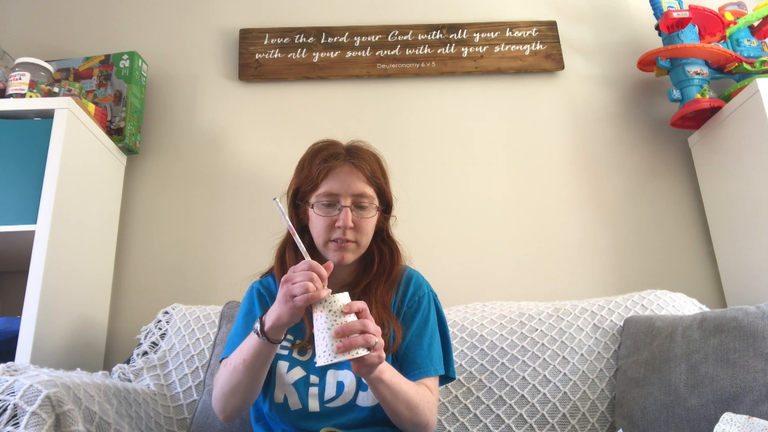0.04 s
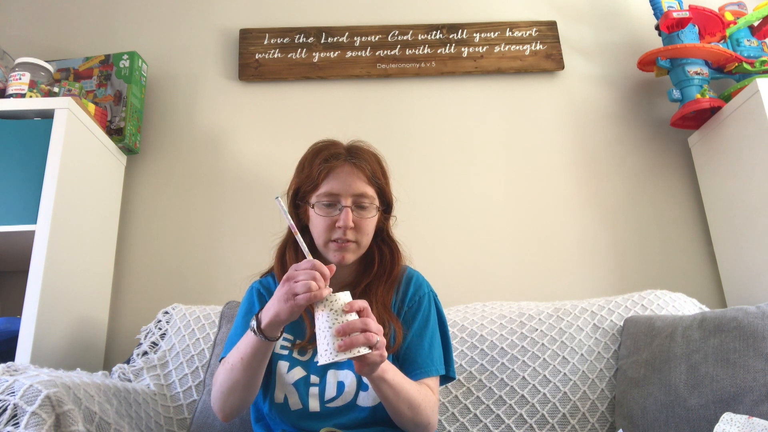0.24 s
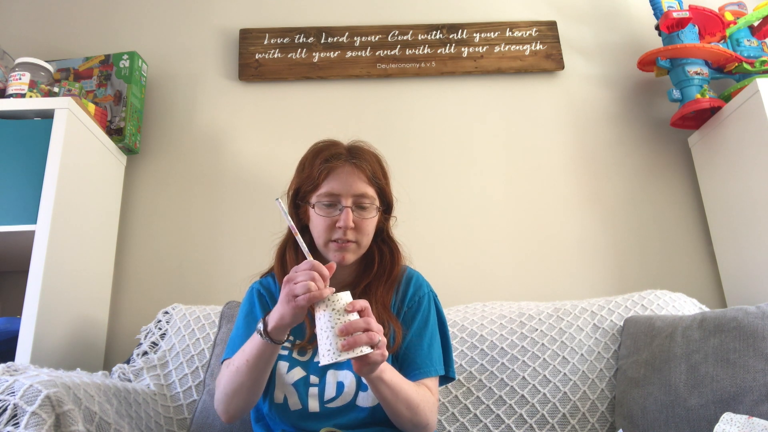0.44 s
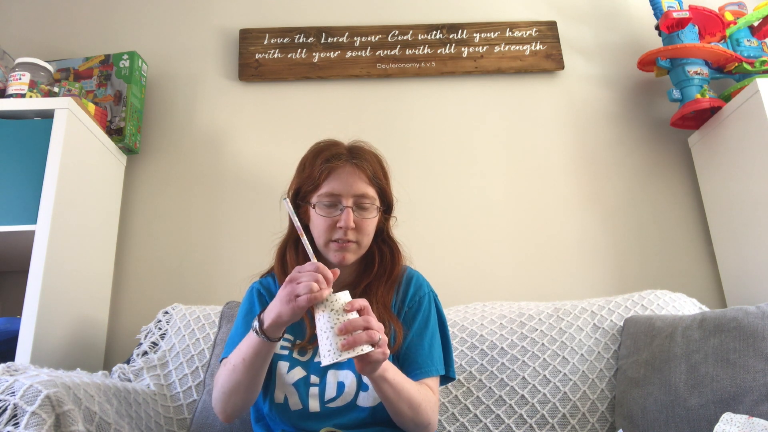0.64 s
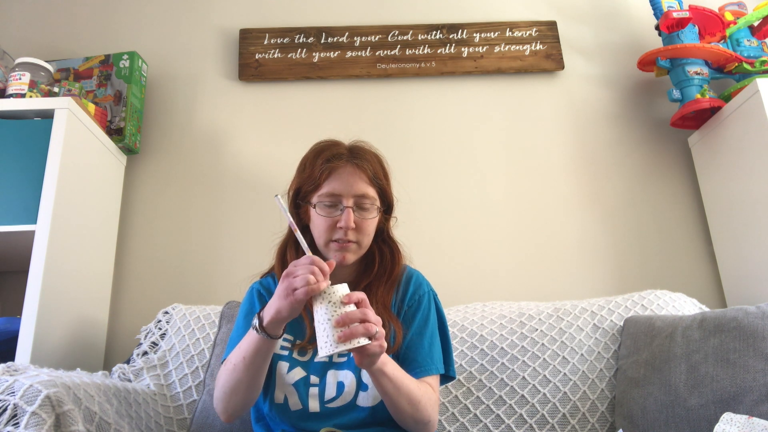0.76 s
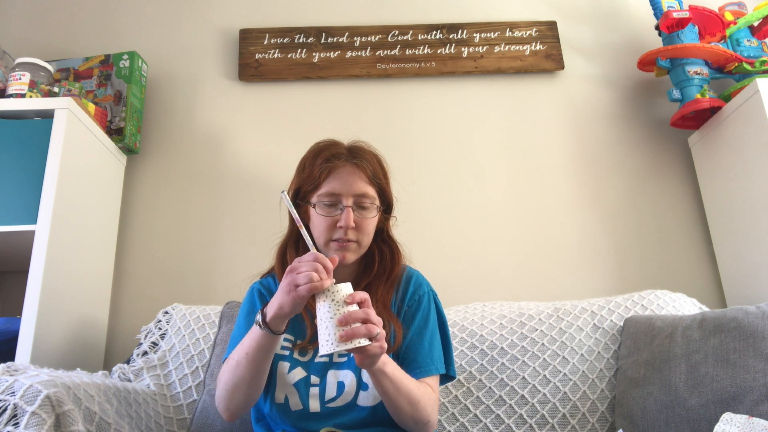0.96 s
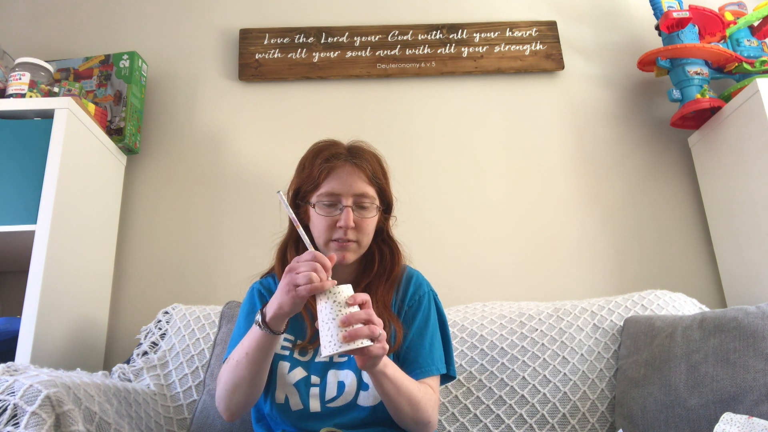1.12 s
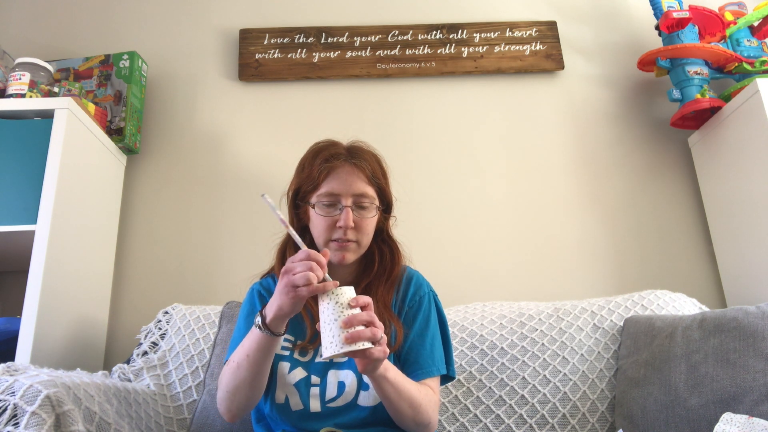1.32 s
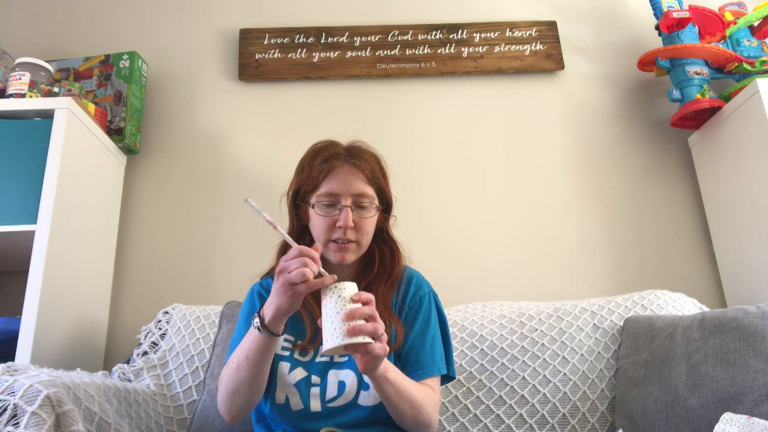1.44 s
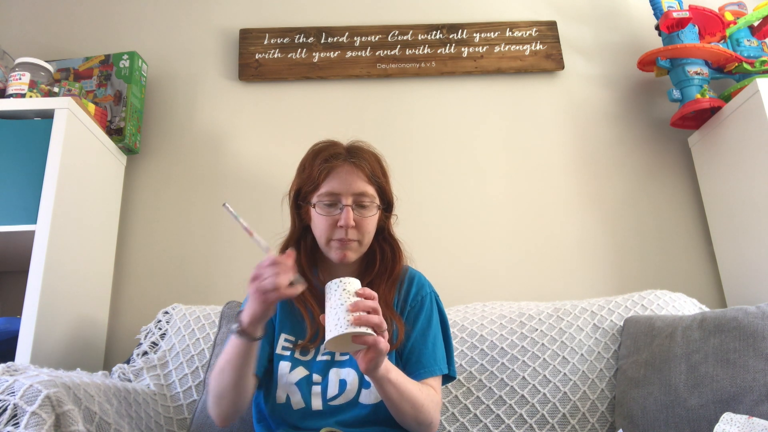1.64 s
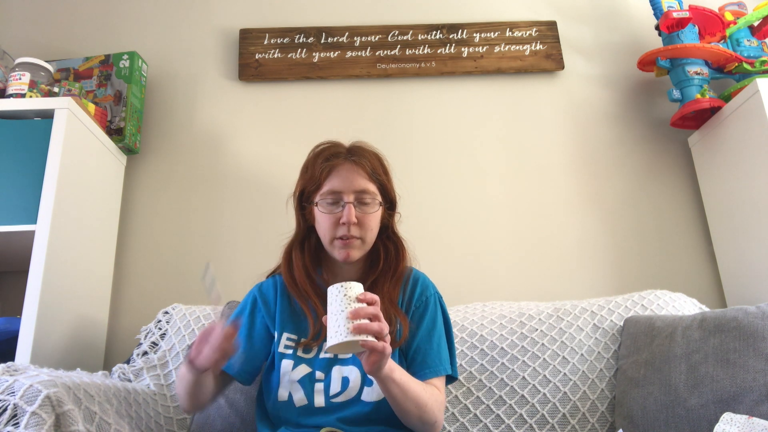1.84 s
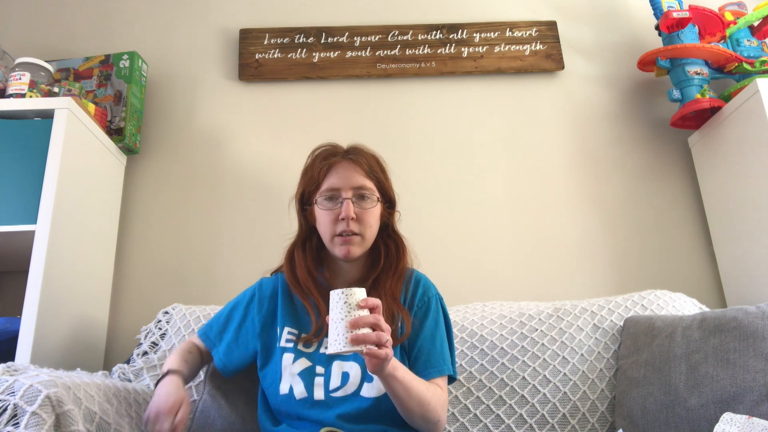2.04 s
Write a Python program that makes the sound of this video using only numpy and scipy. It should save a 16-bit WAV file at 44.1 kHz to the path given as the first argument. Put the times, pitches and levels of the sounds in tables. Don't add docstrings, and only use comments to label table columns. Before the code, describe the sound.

Thin paper cup punctured by a pointed stick, first ticking, then crackling and snapping, then popping free with a hollow squeaky rattle; faint taps and cloth rustle after, heard by a hissy phone across a living room.

```python
import sys
import numpy as np
from scipy import signal
from scipy.fft import rfft, irfft, next_fast_len
from scipy.io import wavfile
from scipy.ndimage import uniform_filter1d

SR = 44100
rng = np.random.default_rng(int(sys.argv[2]) if len(sys.argv) > 2 else 0)


def boost_factor(decibels):
    exponent = np.asarray(decibels, float) / 20
    return 10 ** exponent


def transcribe(u):
    v = np.clip(np.atleast_2d(u).T, -1, 1)
    q = np.round(v * 32767).astype(np.int16)
    wavfile.write(sys.argv[1], SR, q)


N = 91728

# [f/Hz, level/dB]
HISS_COLOUR = [(20, -35), (35, -3), (60, 10), (110, 5.5), (300, 1), (1000, -4), (4000, -16), (16000, -24)]
# [t/s, level/dB]
HISS_GAIN = [(0, -0.5), (.25, 2.5), (.6, 1.5), (.85, -1), (1.05, 1), (1.3, -1), (1.55, 2), (2.08, 1.5)]
# [f/Hz, t60/s]
ROOM_DECAY = [(300, 0.51), (1000, 0.3), (2200, 0.35), (4000, 0.42), (8000, 0.36), (15000, 0.12)]
# [t/s, level/dB]
RUSTLE_LEVEL = [(0, -53), (.11, -57.5), (.15, -65.5), (.24, -57.5), (.33, -61.5), (.5, -59), (.62, -59.5),
                (.85, -65.5), (1.35, -67.5), (1.5, -64.5), (1.62, -64), (1.78, -67), (1.87, -59),
                (2.0, -57), (2.08, -63)]
# [f/Hz, level/dB]
CLOTH_COLOUR = [(600, 7), (1000, -5), (2200, -2.5), (3500, -2.5), (6500, -4.5), (9500, -10.5),
                (10500, -16.5), (16000, -12.5)]
# [t/s, level/dB, f/Hz, width/Hz, t60/s]
SKIN_SCUFFS = [
    (0, -60.5, 2560, 460, 0.61),
    (0, -63.5, 5000, 706, 0.43),
    (0.224, -53.5, 860, 500, 0.15),
    (0.478, -54.5, 2200, 130, 0.19),
    (1.497, -68, 2970, 503, 0.35),
    (1.598, -58, 3000, 920, 0.21),
]
# [t/s, level/dB, f/Hz, width/Hz]
FINGER_KNOCKS = [
    (1.385, -49.5, 246.5, 4.6),
    (1.4245, -41.5, 300, 180),
    (1.447, -57, 254, 84),
    (1.496, -46.5, 363, 120),
    (1.533, -40, 290, 54),
    (1.54, -48.5, 608, 24),
    (1.598, -43, 316, 110),
    (1.604, -44, 132, 93),
    (1.887, -49, 390, 57),
]
# [t/s, level/dB, f/Hz, width/Hz]
PAPER_TICKS = [(.003, -43.5, 2500, 600), (.038, -40, 2200, 900), (.038, -36, 13000, 6000),
               (.077, -35, 10200, 9000), (.094, -36.5, 2650, 3000), (.2215, -38, 1130, 600),
               (.2215, -48, 2500, 2520), (.2268, -39, 834, 330), (.2268, -38, 1500, 900),
               (.2272, -39.5, 4170, 900), (.2272, -39.5, 2700, 700), (.2272, -41.5, 9200, 3000),
               (.247, -44.5, 2600, 800), (.247, -55, 8000, 8000), (.287, -46, 7000, 12000),
               (.364, -43, 7000, 12000), (.429, -41, 6000, 9000), (.4305, -47, 11000, 6000),
               (.459, -39, 11000, 8240), (.477, -43, 2600, 1400), (.477, -31, 4300, 810),
               (.478, -29.5, 10600, 6000), (1.4954, -50, 14700, 3000), (1.4975, -44, 2430, 2950),
               (1.5345, -42, 2750, 1000), (1.5345, -42, 900, 900), (1.546, -51, 12000, 6000),
               (1.5967, -39, 3100, 500), (1.5967, -53, 4540, 1500), (1.5967, -46, 11000, 6000),
               (1.6825, -49, 11500, 5000), (1.685, -50, 4300, 506), (1.8083, -28.5, 15700, 2970),
               (1.8083, -47, 9000, 5000), (1.8328, -42, 1760, 890), (1.8328, -34.5, 3450, 1800),
               (1.8328, -34, 9000, 9000), (1.8328, -42, 14500, 3030), (1.8533, -43, 3800, 700),
               (1.856, -48, 4550, 500)]
# [t/s, level/dB, f/Hz, width/Hz]
THIN_RINGS = [(.645, -39.5, 805.4, 3.6), (0.644, -39, 1604, 3.5), (.65, -39, 1976, 10),
              (.65, -48, 2170, 12), (0.651, -38, 2444, 7.8), (.65, -49, 2680, 20), (.65, -35, 3470, 9),
              (0.649, -28, 3890, 8), (0.651, -46, 4390, 6.5), (1.137, -38, 721, 8.8),
              (1.136, -41, 942, 2.7), (1.137, -41, 990, 2.8), (1.136, -36, 1066, 12.5),
              (1.137, -37, 1285, 4.7), (1.137, -40, 1986, 11), (1.137, -37, 2220, 5.4),
              (1.135, -43, 4140, 7.9), (1.137, -44, 1575, 5.3)]
# [t/s, level/dB]
POPS_FREE = [
    (1.0783, -16.5),
    (1.0794, -1),
]
# [t/s, level/dB, f/Hz, width/Hz]
STICK_JERKS = [(1.0715, -37, 890, 500), (1.0772, -29, 2200, 1500), (1.0791, -39, 14700, 3500),
               (1.082, -37.5, 350, 53), (1.0822, -21, 1000, 350), (1.0838, -14.5, 1130, 400),
               (1.0892, -14.5, 1050, 210), (1.092, -24, 2250, 160), (1.0925, -14, 890, 302),
               (1.0985, -20.5, 920, 300), (1.1045, -20, 650, 185.2), (1.107, -22, 1000, 250),
               (1.119, -24, 1050, 200), (1.1295, -25, 1370, 400), (1.1305, -41, 6000, 6000),
               (1.1305, -21, 2080, 210), (1.1315, -42, 4100, 130), (1.1343, -14, 1014, 128),
               (1.1345, -20, 750, 150), (1.1345, -31, 2110, 250)]
# [f/Hz, width/Hz, level/dB]
HOLLOW_MODES = [(650, 231, 5.5), (1000, 485, 7.5), (1500, 510, -0.5), (2250, 150, -9.5), (3400, 770, -33)]
# [t/s, slip rate f/Hz, level/dB]
SLIDE_MOTION = [
    (1.06, 1000, -59),
    (1.074, 1000, -57),
    (1.082, 1050, -29.5),
    (1.112, 1050, -33),
    (1.121, 1031, -27),
    (1.127, 1050, -31),
    (1.134, 1050, -29.5),
    (1.142, 1067, -32),
    (1.175, 1046, -49),
]
# [f/Hz, width/Hz, level/dB]
RUBBED_MODES = [(690, 42, 9.5), (1050, 33, 9), (1330, 100, 5), (1570, 330, -3.5), (2200, 220, 2),
                (2600, 180, -17.5), (3800, 110, -33), (4040, 270, -23), (7000, 5600, -24)]
# [f/Hz, width/Hz, level/dB]
RUBBED_BODY = (1500, 6200, -7)
# [t/s, level/dB]
TEAR_FORCE = [
    (.585, -62),
    (.602, -47),
    (.609, -46),
    (.623, -45.5),
    (.631, -41),
    (.639, -29.5),
    (.648, -24.5),
    (.665, -34.5),
    (.7, -60),
]
# [t/s, level/dB, f/Hz, width/Hz]
PAPER_SNAPS = [(.5983, -46, 2500, 900), (.6048, -30, 2870, 700), (.6048, -32, 14000, 5000),
               (.6078, -32, 3100, 900), (.6082, -32, 1080, 500), (.6082, -45, 14500, 3000),
               (.6205, -33, 5400, 500), (.6235, -30, 2600, 900), (.6255, -33, 3230, 900),
               (.6345, -34, 2000, 800), (.636, -19.5, 930, 400), (.6385, -10.5, 1860, 497),
               (.6422, -6, 1670, 332), (.6422, -11.5, 794, 130), (.6425, -17, 4200, 900),
               (.6425, -23, 7170, 400), (.6425, -25, 11200, 900), (.6447, -15.5, 1830, 300),
               (.648, -13, 2500, 250), (.6515, -24, 2350, 600), (.6545, -17, 2350, 500),
               (.657, -20.5, 2440, 500), (.657, -32, 8150, 500), (.6655, -26, 840, 250),
               (.666, -17, 4000, 700), (.672, -27.5, 830, 250), (.673, -22, 2300, 595)]
# [f/Hz, width/Hz, level/dB]
WALL_MODES = [(735, 400, 3), (1640, 830, -3), (2073, 81, 2.5), (2690, 590, 0), (3100, 570, -1.5),
              (3750, 450, -7), (4300, 96, -4.5), (5800, 410, -51), (6720, 1500, -20), (8270, 3300, -21),
              (10860, 760, -23), (12900, 6200, -19.5)]
# [f/Hz, width/Hz, level/dB]
WALL_BODY = (2000, 2500, -12)

LOW_CUT_HZ = 300


def unit(x):
    return x / np.sqrt(np.mean(x ** 2) + 1e-20)


def along(points, hz):
    f, value = np.transpose(points)
    return np.interp(np.log(hz + 1), np.log(f + 1), value, left=value[0], right=value[-1])


def curves(rows):
    s, *columns = np.transpose(rows)
    t = np.arange(N) / SR
    span = (t >= s[0]) & (t <= s[-1])
    return [np.interp(t, s, column) for column in columns] + [span]


def filtered(x, response):
    size = next_fast_len(N + SR // 2)
    spectrum = rfft(x, size) * response(np.fft.rfftfreq(size, 1 / SR))
    return irfft(spectrum, size)[..., :N]


def high_pass(order, edge_hz):
    return lambda f: (1j * f / (edge_hz + 1j * f)) ** order


def body(x, modes, soft_hz=40000):
    def response(f):
        ring = 0
        for k, (centre, width, db) in enumerate(modes):
            ring = ring + (-1) ** k * boost_factor(db) * 1j * f * width / (centre ** 2 - f ** 2 + 1j * f * width)
        return ring * high_pass(2, LOW_CUT_HZ)(f) / (1 + 1j * f / soft_hz) ** 2

    click = np.arange(N) == 0
    return filtered(x, response) / np.abs(filtered(click, response)).max()


def impulses(rows):
    x = np.zeros(N)
    for s, db in rows:
        x[round(s * SR)] += boost_factor(db)
    return x


def pings(rows, attack_cycles):
    x = np.zeros(N + SR)
    t = np.arange(SR // 2) / SR
    for s, db, hz, width in rows:
        attack = 1 - np.exp(-t * hz / attack_cycles)
        ring = np.exp(-np.pi * width * t) * attack * np.sin(2 * np.pi * hz * t)
        x[round(s * SR):][:len(t)] += boost_factor(db) * ring / np.abs(ring).max()
    return x[:N]


def gritty(x, samples, decay_s, edge=None):
    grit = rng.standard_normal(samples) * np.exp(-np.arange(samples) / SR / decay_s)
    if edge is not None:
        grit[0] = edge
    return signal.fftconvolve(x, grit / np.linalg.norm(grit))[:N]


def noise(colour, patchy_db):
    z = signal.stft(rng.standard_normal(N + 512), nperseg=512)[2]
    patches = uniform_filter1d(rng.standard_normal(z.shape), 8, axis=0)
    patches = uniform_filter1d(patches, 8, axis=1)
    x = signal.istft(z * boost_factor(patchy_db * unit(patches)), nperseg=512)[1][:N]
    return unit(filtered(x, lambda hz: boost_factor(along(colour, hz))))


def hiss():
    level_db = -59.5 + curves(HISS_GAIN)[0]
    return boost_factor(level_db) * noise(HISS_COLOUR, patchy_db=0.8)


def room(x, wet_db):
    delay_s, near_s, near_db = 0.007, 0.0016, -25.5
    hz, t, z = signal.stft(rng.standard_normal(SR // 2), SR, nperseg=256)
    decay = boost_factor(-60 * t / along(ROOM_DECAY, hz)[:, None])
    tail = signal.istft(z * decay, SR, nperseg=256)[1]
    tail = np.pad(boost_factor(wet_db) * tail / np.linalg.norm(tail), (round(delay_s * SR), 0))
    tail[round(near_s * SR)] += boost_factor(near_db)
    return x + signal.fftconvolve(x, tail)[:N]


def rustle():
    return boost_factor(curves(RUSTLE_LEVEL)[0]) * noise(CLOTH_COLOUR, patchy_db=0.8)


def scuffs():
    t = np.arange(N) / SR
    x = np.zeros(N)
    for s, db, hz, width, t60 in SKIN_SCUFFS:
        fade = boost_factor(db - 60 * (t - s) / t60) * (t >= s)
        x += fade * unit(body(rng.standard_normal(N), [(hz, width, 0)], soft_hz=hz))
    return boost_factor(5) * x


def knocks():
    return pings(FINGER_KNOCKS, attack_cycles=0.46)


def ticks():
    return gritty(pings(PAPER_TICKS, attack_cycles=0.91), SR // 150, decay_s=0.0023, edge=12)


def rings():
    steady = 0.6
    x = np.zeros(N)
    for mode in THIN_RINGS:
        drift = uniform_filter1d(rng.standard_normal(N), size=200)
        flutter = unit(uniform_filter1d(drift, size=200))
        x += pings([mode], attack_cycles=4.2) * (steady + flutter) / 2
    return x


def squeak(soft_hz):
    jitter_cycles, spread_db, scrape_db = 0.05, 1.5, 0
    rate_hz, level_db, span = curves(SLIDE_MOTION)
    draw = rng.standard_normal((3, N))
    wander = unit(uniform_filter1d(draw[0], size=60))
    phase = np.cumsum(rate_hz / SR) + jitter_cycles * wander
    slips = np.diff(np.floor(phase), prepend=0) > 0
    drive = unit(slips * boost_factor(spread_db * draw[1])) + boost_factor(scrape_db) * draw[2]
    modes = RUBBED_MODES + [RUBBED_BODY]
    steady_level = np.std(body(drive, modes, soft_hz))
    return body(drive * boost_factor(level_db) * span, modes, soft_hz) / steady_level


def withdrawal():
    soft_hz = 6000
    clicks = impulses(POPS_FREE)
    pops = body(clicks, HOLLOW_MODES, soft_hz)
    crack = boost_factor(-20.5) * body(gritty(clicks, SR // 200, decay_s=0.0023), [(7000, 9000, 0)])
    return pops + crack + squeak(soft_hz) + pings(STICK_JERKS, attack_cycles=1.0)


def puncture():
    fibres_per_s, spread_db = 6000, 1.5
    draw = rng.random((N, 3))
    breaks = draw[:, 0] < fibres_per_s / SR
    size = boost_factor(-spread_db * np.log(1 - draw[:, 1]))
    fibres = breaks * size * np.sign(draw[:, 2] - 0.5)
    force_db, span = curves(TEAR_FORCE)
    tearing = body(fibres * boost_factor(force_db) * span, WALL_MODES + [WALL_BODY])
    return boost_factor(1.5) * pings(PAPER_SNAPS, attack_cycles=0.21) + tearing


def scene():
    small = room(ticks() + knocks(), wet_db=-9.5)
    torn = filtered(puncture(), high_pass(4, 452))
    pulled = filtered(withdrawal(), high_pass(2, LOW_CUT_HZ))
    cup = room(torn, wet_db=-9) + room(pulled, wet_db=-9) + rings() + small
    return (cup + rustle() + scuffs() + hiss())[None]


def low_pass(x):
    return signal.sosfilt(signal.butter(12, 16650, fs=SR, output="sos"), x)


def record(dry):
    def step(hz, edge_hz):
        return 1 / (1 + np.exp(np.clip((hz - edge_hz) / 60, -50, 50)))

    limited = filtered(dry, lambda hz: 0.04 * step(hz, 16600) + 0.96 * step(hz, 15900))
    return low_pass(limited)


dry = scene()
out = record(dry)
transcribe(out)
```